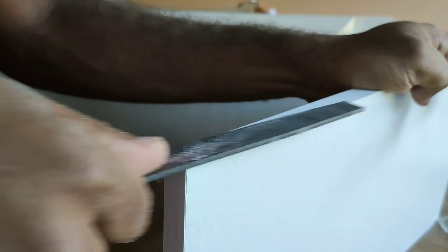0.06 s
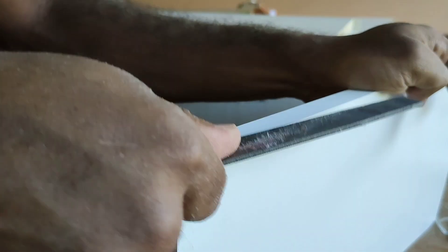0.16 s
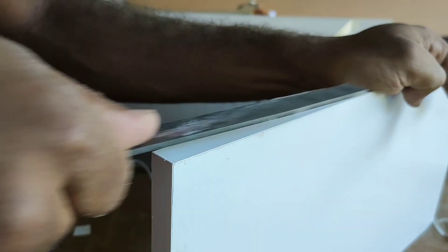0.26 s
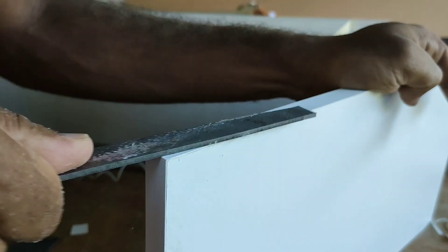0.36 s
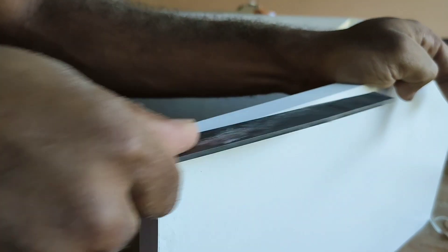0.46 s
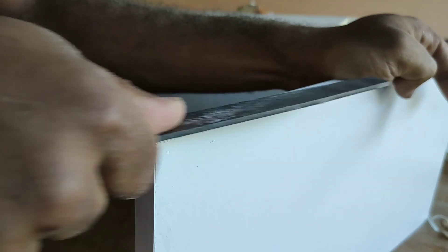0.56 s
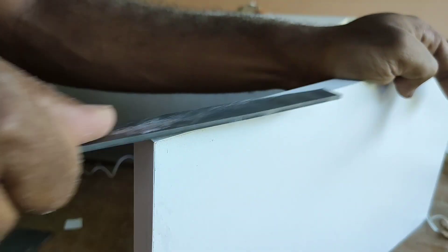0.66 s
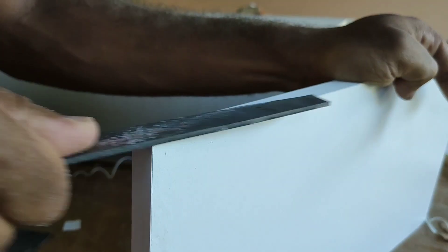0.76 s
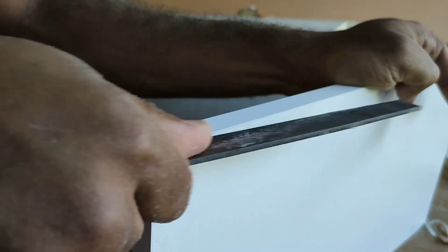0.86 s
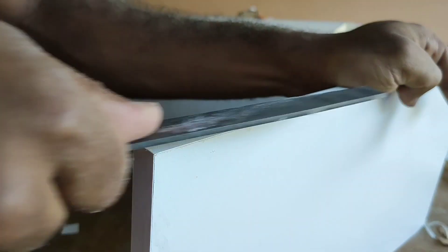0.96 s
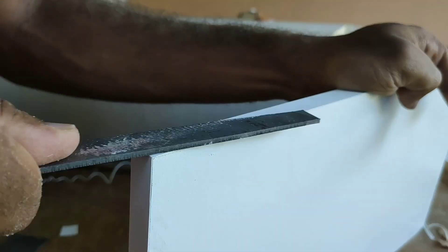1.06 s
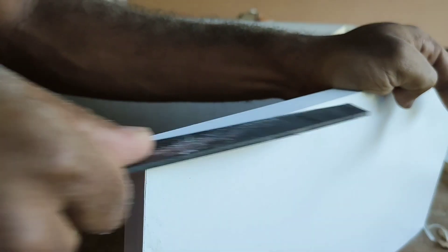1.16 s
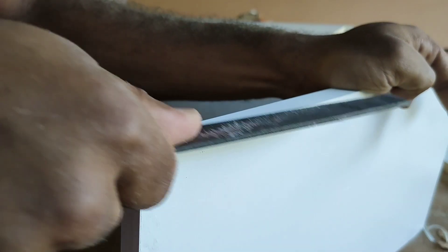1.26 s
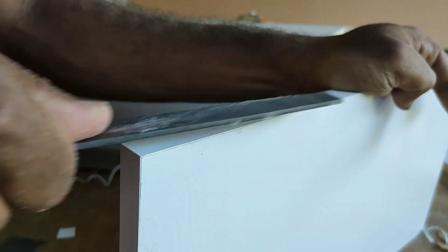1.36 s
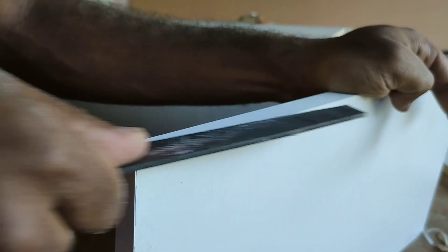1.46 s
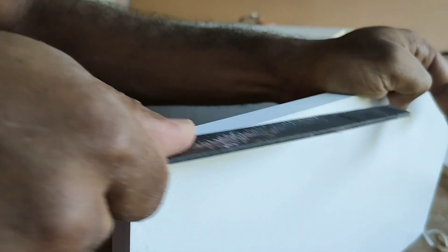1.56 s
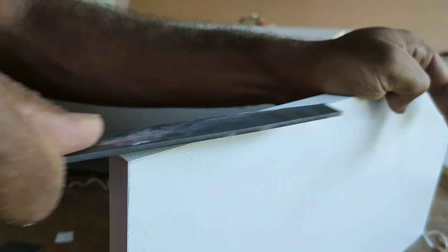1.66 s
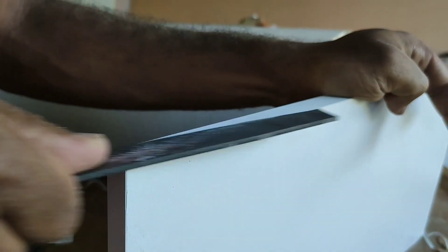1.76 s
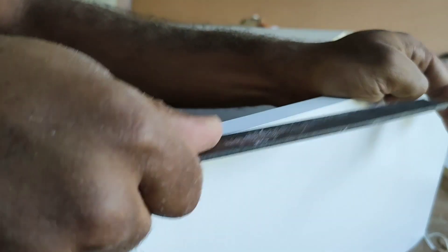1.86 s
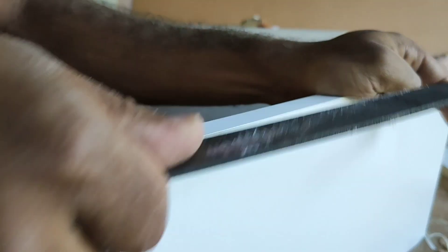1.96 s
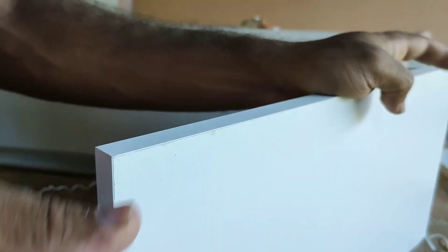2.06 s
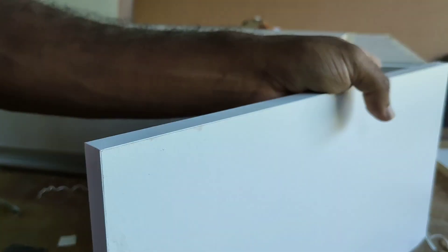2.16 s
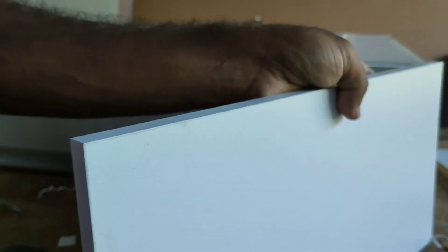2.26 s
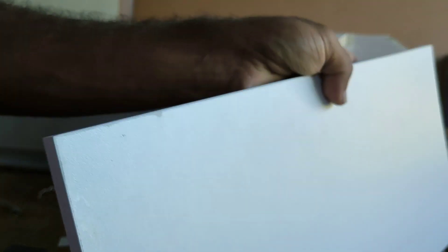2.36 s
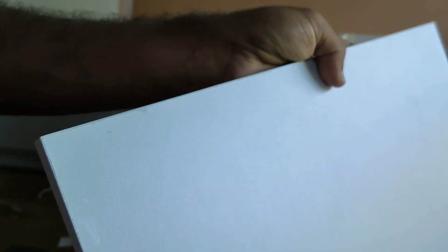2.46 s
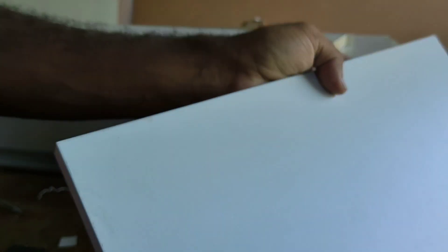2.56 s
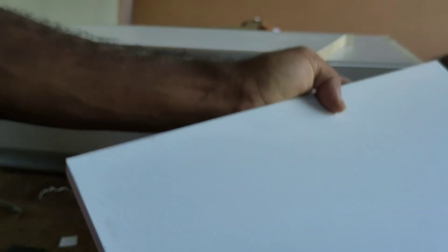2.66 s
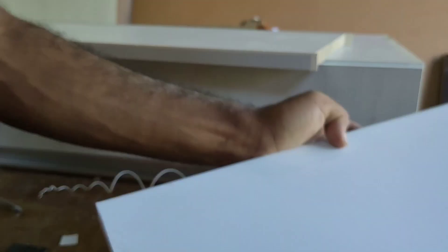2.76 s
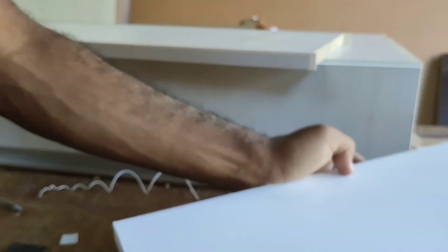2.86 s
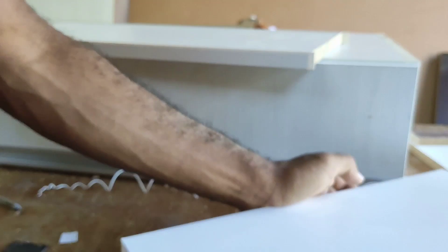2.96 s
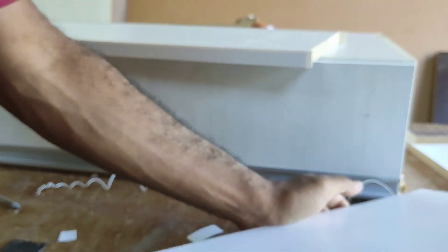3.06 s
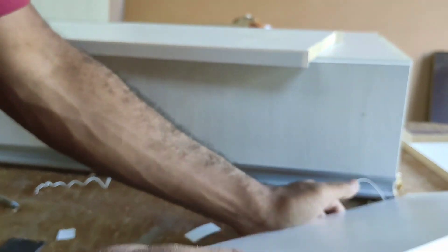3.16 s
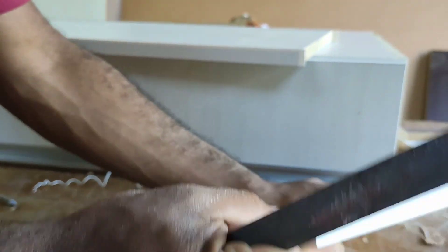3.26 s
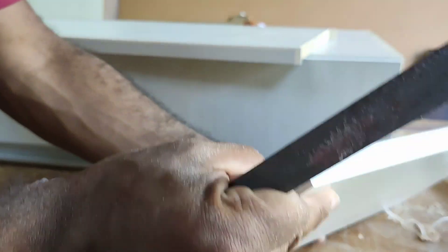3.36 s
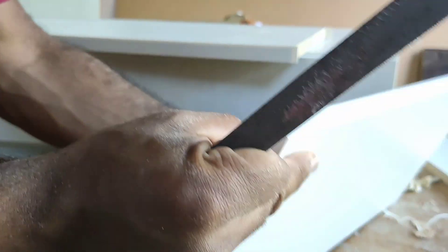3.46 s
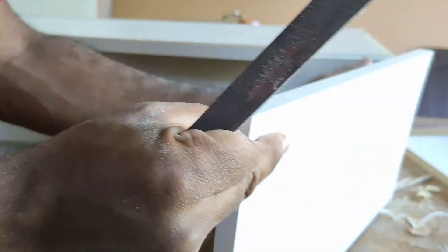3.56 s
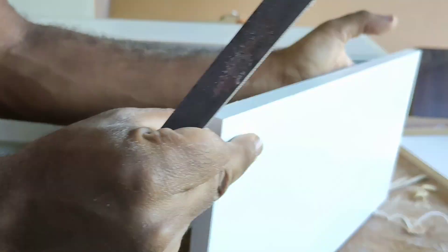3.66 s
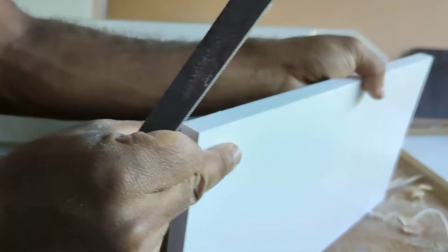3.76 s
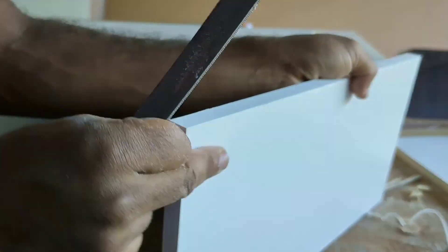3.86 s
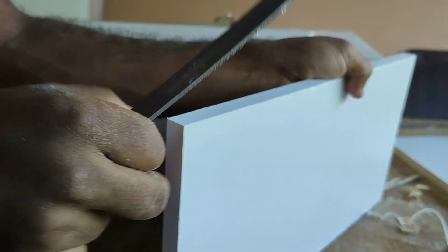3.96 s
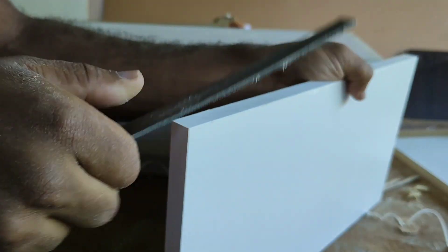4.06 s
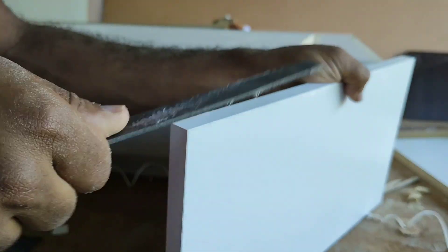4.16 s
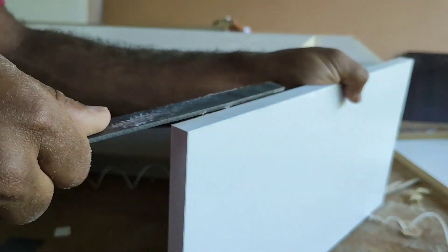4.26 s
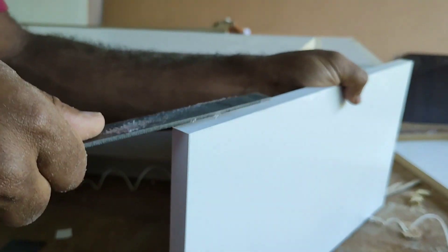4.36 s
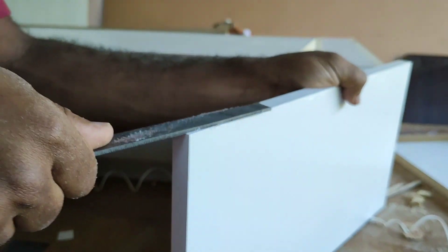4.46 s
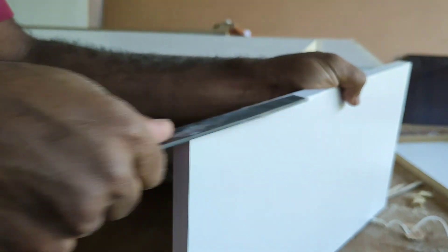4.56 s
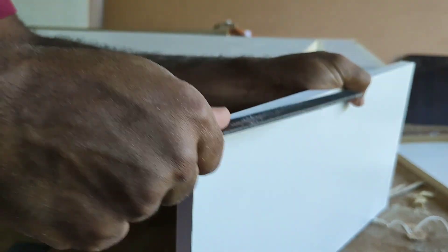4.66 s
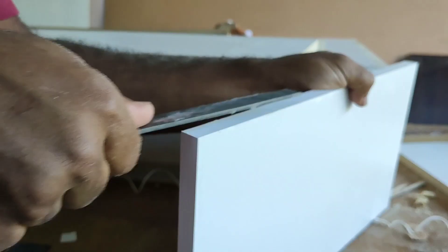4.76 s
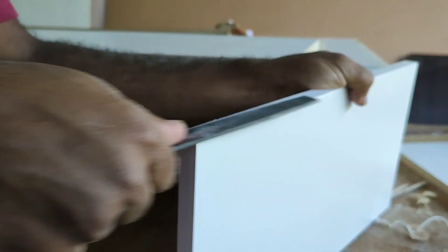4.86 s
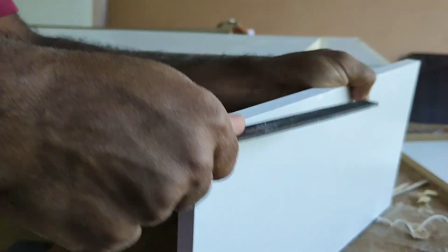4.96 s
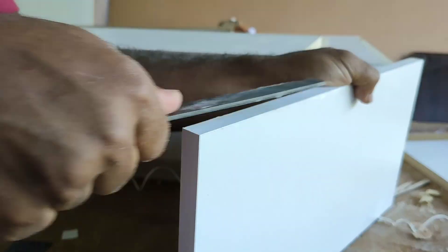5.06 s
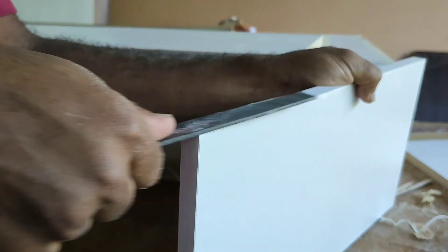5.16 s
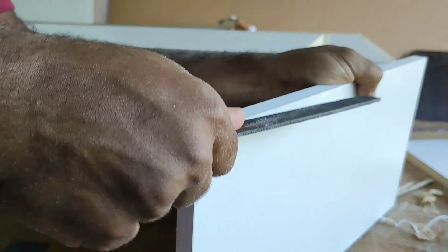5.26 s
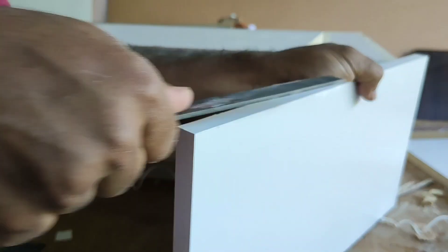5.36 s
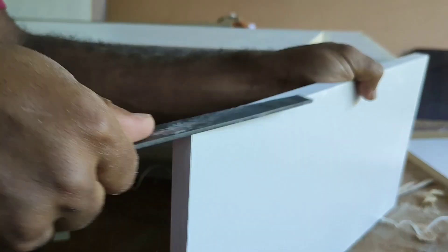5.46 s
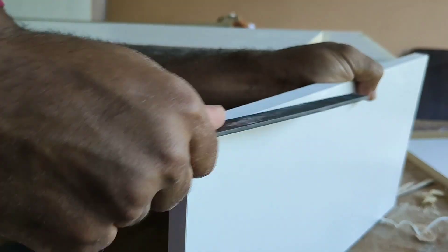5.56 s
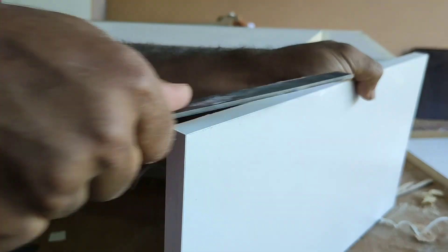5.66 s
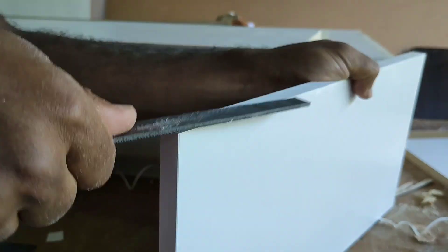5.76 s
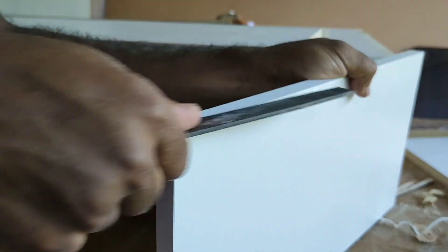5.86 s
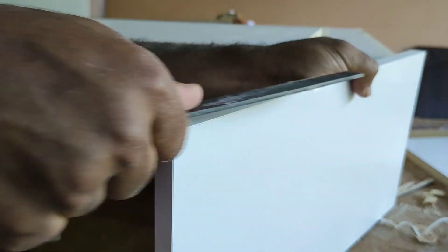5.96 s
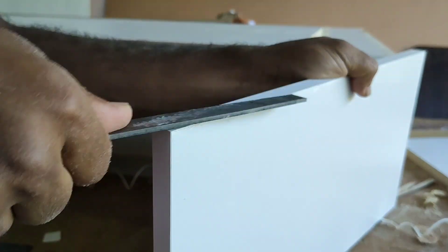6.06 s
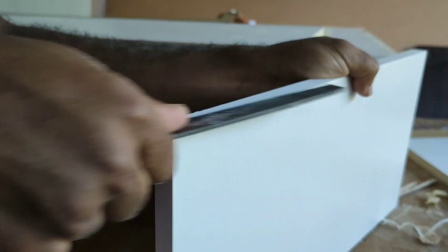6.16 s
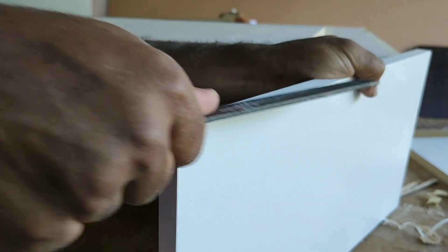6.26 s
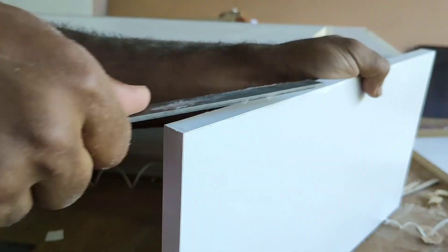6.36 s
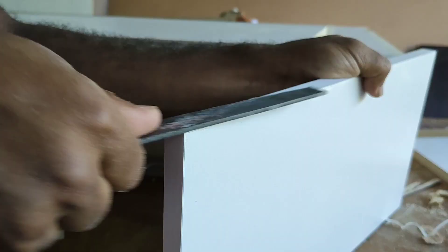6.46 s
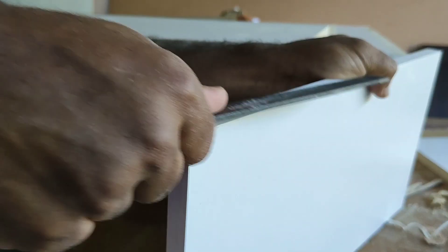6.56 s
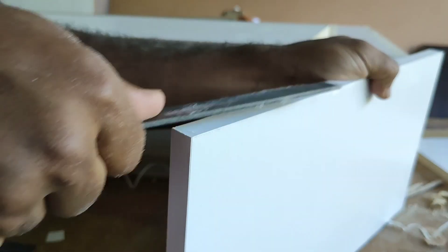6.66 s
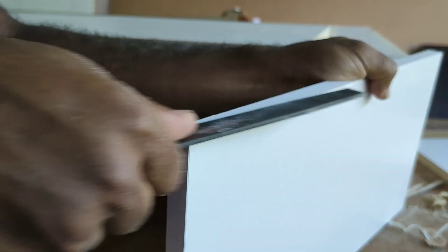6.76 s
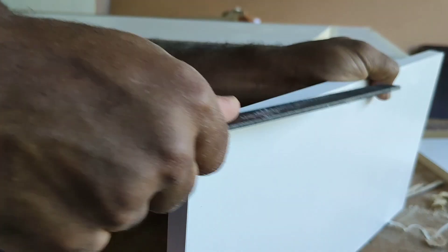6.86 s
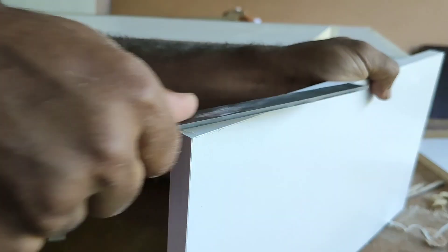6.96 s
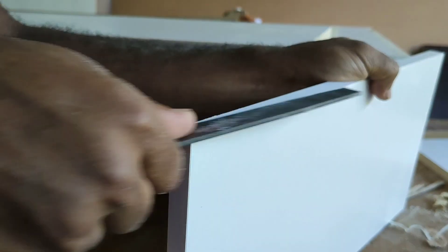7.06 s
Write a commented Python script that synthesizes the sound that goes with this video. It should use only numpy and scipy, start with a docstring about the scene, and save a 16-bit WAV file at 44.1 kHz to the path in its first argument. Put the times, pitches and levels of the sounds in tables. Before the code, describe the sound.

A steel file rasps along a board's edge in quick strokes, pausing for light taps and a knock, in a small workshop.

```python
"""The room's ring from an earlier stroke fades, and a flat steel file lands on the edge of a coated board
and is pushed along it, about three times a second. Its teeth slip over the edge one by one and drive the
board's modes, while torn chips hiss. After six strokes, hands brush and tap the board as they turn it
over, and set it on the bench with a knock. Eight strokes follow on the other edge, then one last landing
of the file. Throughout, a small bare workshop reverberates over a low murmur."""
import sys
import numpy as np
from scipy import signal
from scipy.fft import rfft, irfft, next_fast_len
from scipy.io import wavfile
from scipy.ndimage import uniform_filter1d

SR = 44100
rng = np.random.default_rng(int(sys.argv[2]) if len(sys.argv) > 2 else 0)


def persist_wave(psi):
    """Save psi, clipped to +-1, as 16-bit WAV."""
    counts = np.round(np.clip(psi, -1, 1) * 32767).astype(np.int16)
    wavfile.write(sys.argv[1], SR, np.atleast_2d(counts).T)


N = 313551

# Strokes of the file; delays count from the touch and levels are relative. Each row: touch in seconds;
# delays to bearing down, hardest push and stop in seconds; levels of rasp, chip hiss, settling judder,
# stopping judder and singing teeth in dB; delay and hold of the singing in seconds, its swell in dB per
# second; delay to the fastest slipping in seconds, that slip rate in Hz, run-up and run-out in seconds;
# rate that slowing teeth cling to in Hz; base levels of the second and third harmonics in dB.
STROKES = [ (.064, 0.037, 0.11, 0.18, -32, -40.5, -39, -36.5, -38.5, 0.13, 0.015, 347, 0.11, 740, .11, 0.082, 498, 2.5, -1),
           (.43, 0.014, 0.11, 0.16, -31.5, -38.5, -38, -46, -27.5, 0.12, 0.015, 398, 0.096, 830, 0.072, .063, 604, -4.5, -9.5),
           (.752, 0.047, 0.11, 0.17, -32.5, -39.5, -36, -43, -29, 0.13, 0.029, 354, 0.11, 730, .13, 0.083, 602, -5, -9),
           (1.111, 0.032, 0.1, 0.17, -34.5, -39.5, -39.5, -60, -38.5, 0.11, 0.029, 300, 0.11, 739, .093, 0.089, 510, 3, 3.5),
           (1.468, 0.0069, 0.082, .16, -34.5, -43, -36.5, -50, -43.5, 0.093, 0.034, 295, 0.093, 700, 0.08, 0.08, 518, 7.5, 6.5),
           (1.807, 0.0067, 0.08, 0.12, -32.5, -39.5, -50.5, -66, -36.5, 0.058, 0.024, 350, 0.096, 840.5, 0.081, .09, 620, 3.1, -2.5),
           (4.512, 0.034, 0.11, 0.18, -31, -41, -38.5, -47, -21, 0.123, 0.015, 1800, 0.11, 750, 0.092, 0.061, 672.2, -8, -10.5),
           (4.905, 0.0011, 0.048, .12, -30.5, -39, -34, -40, -29, 0.051, 0.017, 500, 0.069, 799, .069, 0.19, 645, -11, -9),
           (5.218, .001, 0.098, 0.13, -31.5, -40.5, -30, -64, -35.5, 0.067, 0.021, 400, 0.078, 750.7, 0.099, 0.12, 619, 0.5, -6),
           (5.529, 0.0022, 0.077, 0.15, -32.5, -44.5, -30.5, -59, -43.5, 0.078, 0.016, 400, 0.087, 688, 0.083, 0.15, 620, -3.5, -4.5),
           (5.862, 0.0023, 0.088, 0.13, -31, -42.5, -34.5, -53, -39, 0.064, 0.0081, 500, 0.071, 700, .053, 0.06, 590, -20, -5),
           (6.153, 0.033, .12, 0.147, -31.5, -39.5, -32.5, -38.5, -35, .088, 0.013, 500, 0.11, 752, 0.058, 0.064, 573, -5, -2.5),
           (6.502, .001, 0.058, 0.13, -30.5, -44, -32, -43, -40, 0.048, 0.026, 398, 0.051, 672.6, 0.12, 0.084, 528, -7.5, -8),
           (6.789, .001, 0.087, 0.13, -29.5, -40, -31, -37.5, -42, 0.061, 0.027, 400, 0.099, 649, 0.11, 0.1, 527, -0.5, -8.5),
           ]
# Normal modes of the board. Each row: frequency in Hz, time to decay 60 dB in seconds before the file
# damps it, and weights in dB for filing the first edge, filing the second edge and a landing.
BOARD_MODES = [(108.7, 0.12, -35, -39, -23.5), (210, 0.16, -39.5, -28.5, -22), (310, 0.041, -39.5, -4, -9),
               (421.5, 0.039, -29.5, -3.5, 5.5), (643, 0.14, 4, -43, -36), (700, 0.032, 6.5, 9.5, -0.5),
               (900, 0.22, 0, -11, -22), (1122.5, 0.05, 15, 3, 6.5), (1352, 0.053, 1.5, 9, -0.5),
               (1422, 0.033, 18, -43, 3), (1712, 0.043, 4.5, 6.5, 3.5), (1783, 0.086, -19, 11, -17.5),
               (1945, 0.045, 14.5, -3.5, 3), (2280, 0.014, -57, -3.5, 7), (2340, 0.014, -19, -20, -30.5),
               (2496, 0.033, -61, -45, -10.5), (2997, 0.021, -22.5, 0, -13), (3475, 0.012, -34, -37, -7)]
TURNED_S = 3.0  # later strokes are on the second edge


def filing():
    """Forced vibration: friction drives the board's modes. Returns their sound and the chips' envelope."""
    hz, t60, first_edge_db, second_edge_db, _ = np.transpose(BOARD_MODES)
    low = hz < 500
    t = np.arange(SR // 5) / SR
    board, chip_envelope = np.zeros(N), np.zeros(N)
    for row in STROKES:
        touch, down, hardest, stop = row[:4]
        rasp_db, hiss_db = pressure_levels(t, down, hardest, stop, *row[4:6])
        judder_db = judder_level(t, stop, *row[6:8])
        teeth, cycles = tooth_slips(t, *row[8:])
        catches, clumps = tooth_catches(len(t))
        contact = np.clip(np.minimum(t, stop - t) / 0.0063, 0, 1)
        mode_db = first_edge_db if touch < TURNED_S else second_edge_db
        drives = ((amp(rasp_db) * catches, ~low, 0.6), (amp(judder_db) * catches, low, 0.8),
                  (teeth, ~low, 0.4))  # teeth under pressure damp the edge
        for force, modes, decay_share in drives:
            response = ring(hz[modes], mode_db[modes], decay_share * t60[modes])
            add(board, touch, signal.fftconvolve(force * contact, response / np.linalg.norm(response)))
        add(board, touch, amp(-12.5) * teeth * contact)  # slips heard directly, past the modes
        tooth_pulse = 1 + 0.25 * np.cos(2 * np.pi * cycles)
        add(chip_envelope, touch, amp(hiss_db) * contact * clumps ** 0.13 * tooth_pulse)
    board = signal.lfilter([1, -1], [1, -0.985], board)  # a small panel radiates little bass
    return board, chip_envelope


def tooth_slips(t, sing_db, onset, hold, swell, fastest, top_hz, run_up, run_out, cling_hz, two_db, three_db):
    """Stick-slip motion: evenly spaced teeth sing in harmonics. Returns the force and its cycle count."""
    level_db = sing_db - swell * np.maximum(onset - t, 0)
    level_db -= 802 * np.maximum(t - onset - hold, 0)  # fall in dB per second
    speeding = t < fastest
    arch_hz = top_hz * (1 - ((t - fastest) / np.where(speeding, run_up, run_out)) ** 2)
    slip_hz = np.maximum(arch_hz, np.where(speeding, 250, cling_hz))  # a board mode holds the slip rate
    cycles = np.cumsum(slip_hz * (1 + 0.011 * flicker(len(t), size=300))) / SR  # the hand is never even
    cycles += 0.045 * flicker(len(t), size=90)  # each tooth slips a little early or late
    lift_db = np.minimum(0.59 * (level_db.max() - level_db), 16.5)  # overtones outlast the fundamental
    overtones_db = [db + lift_db for db in (two_db, three_db, three_db - 3.5, three_db - 2)]
    force = np.zeros(len(t))
    for harmonic, db in enumerate([0, *overtones_db], start=1):
        chatter_db = 2 * flicker(len(t), size=350)
        force += amp(level_db + db + chatter_db) * np.cos(2 * np.pi * harmonic * cycles)
    return force * (slip_hz / top_hz) ** 3.1, cycles  # slow teeth dig in rather than sing


def tooth_catches(count, per_second=3000):
    """Shot noise: teeth catch at random and chips tear off in clumps. Returns impulses and clump gain."""
    clumps = amp(2.54 * flicker(count, size=200))
    strength = amp(3.6 * np.minimum(rng.exponential(1, count), 4))
    caught = rng.random(count) < per_second / SR
    return unit_rms(clumps * strength * caught * rng.choice([-1, 1], count)), clumps


def pressure_levels(t, down, hardest, stop, rasp_db, hiss_db):
    """Friction noise follows a power law of contact pressure. Returns rasp and hiss levels in dB."""
    rising = t < hardest
    bearing_down = (t - down) / (hardest - down)
    easing_off = 1 - abs((t - hardest) / (stop - hardest)) ** 2.4
    pressure = np.clip(np.where(rising, bearing_down, easing_off), 0.055, 1)  # floor: the file's weight
    decades = np.log10(pressure)
    rasp_db = rasp_db + decades * np.where(rising, 15, 23.5) - 30 * (t < down)
    hiss_db = hiss_db + decades * np.where(rising, 31.5, 26)
    rattle_db = -42 - 885.5 * t  # the file rattles briefly after the touch
    return power_sum_db(rasp_db, rattle_db), hiss_db


def judder_level(t, stop, settle_db, halt_db):
    """Transient excitation, in dB: the file judders as it settles and again just before it stops."""
    settling_db = settle_db - 292 * abs(t - 0.007)
    halting_db = halt_db - 10 * ((t - stop + 0.011) / 0.011) ** 2
    return power_sum_db(settling_db, halting_db)


# Landings of the file on the edge. Each row: start in seconds, peak levels of the low, middle, high
# and top mode groups in dB, level of the steel's snap in dB.
LANDINGS = [(.064, -42, -31.5, -31, -29.5, -46), (.43, -35.5, -28.5, -27.5, -24, -39),
            (.752, -28.5, -14, -24.5, -22.5, -51.5), (1.111, -26, -19, -19.5, -23, -49),
            (1.468, -30.5, -18, -24.5, -20.5, -47), (1.807, -22.5, -18.5, -28, -25.5, -53),
            (4.512, -48.5, -59, -73, -57, -87), (4.572, -27.5, -34, -47, -43, -59),
            (4.906, -47, -23, -24.5, -22, -34), (5.218, -36, -30, -29, -19.5, -36.5),
            (5.528, -38, -23.5, -23, -22, -43.5), (5.863, -22.5, -13, -17, -26, -43.5),
            (6.153, -20, -15.5, -21, -32, -49.5), (6.502, -29, -18, -15, -21, -38),
            (6.789, -26, -22, -19, -19.5, -32), (7.084, -17.5, -14, -16.5, -23.5, -43)]


def landings():
    """Impact excitation: each landing rings the board's modes, weighted by the point of contact."""
    hz, t60, _, _, landing_db = np.transpose(BOARD_MODES)
    groups = np.digitize(hz, (500, 1600, 2100))  # borders in Hz
    out = np.zeros(N)
    for start, *peaks_db, _ in LANDINGS:
        mode_db = landing_db + 2.47 * rng.standard_normal(len(hz))
        for group, peak_db in enumerate(peaks_db):
            modes = groups == group
            hit = ring(hz[modes], mode_db[modes], 0.8 * t60[modes], contact_s=0.00095)
            add(out, start, at_peak(hit, peak_db))
    return out


# Spectrum of the chips and snaps. Each row: frequency in Hz, relative spectral density in dB.
CHIP_SPECTRUM = [(1500, -39.5), (2500, -4), (3470, -11.5), (3900, -23), (4300, -22.5), (4800, -12),
                 (5800, -12), (7380, -5), (8700, -16.5), (9200, -33.5), (11700, -31.5), (13000, -49.5)]


def chips_and_snaps(chip_envelope):
    """Broadband noise: chips hiss as they tear, and steel snaps against the coating at each landing."""
    t = np.arange(2000) / SR
    snaps = np.zeros(N)
    for start, *_, snap_db in LANDINGS:
        add(snaps, start, amp(snap_db - 60 * t / 0.081) * np.minimum(t / 0.002, 1))
    return (chip_envelope + snaps) * diffuse_noise(CHIP_SPECTRUM, patchy_db=0.5)


# Modes of the knock on the bench. Each row: frequency in Hz, weight in dB, 60 dB decay time in seconds.
BENCH_MODES = [(113, -10.5, 0.098), (186.3, -8.5, 0.17), (294, 3, 0.075), (339, -4.5, 0.076),
               (494, -9, 0.076), (604, -1, 0.033), (900, -4, 0.018), (1350, -15, 0.033),
               (1704, -19.5, 0.05), (2060, -22, 0.052), (2480, -13.5, 0.013), (3250, -24, 0.02),
               (3780, -26.5, 0.018)]


def bench_knock(start=3.853, peak_db=-11):
    """Free vibration: board and bench ring from one blow as the board is set down."""
    out = np.zeros(N)
    add(out, start, at_peak(ring(*np.transpose(BENCH_MODES), contact_s=0.0016), peak_db))
    return out


# Taps of the hands. Each row: start in seconds, peak level in dB, pitch in Hz, 60 dB decay time in seconds.
HAND_TAPS = [(2.172, -45.5, 315, 0.038), (2.334, -46, 310, 0.081), (2.42, -53.5, 356, 0.02),
             (2.464, -49.5, 248.5, 0.027), (2.586, -52, 913, 0.025), (2.939, -52.5, 1183, .018),
             (3.213, -46.5, 350, 0.028), (3.333, -39.5, 600, 0.032), (3.399, -43, 765, .02),
             (3.561, -47.5, 1050, 0.023), (3.618, -46, 900, 0.071), (3.672, -39.5, 1710, 0.044),
             (3.993, -49.5, 1890, .02), (4.038, -43.5, 1675, 0.034), (4.26, -35, 665, 0.021)]


def hand_taps():
    """Damped resonance: each light touch on the board excites three short inharmonic modes."""
    out = np.zeros(N)
    for start, peak_db, pitch_hz, t60 in HAND_TAPS:
        tap = ring(pitch_hz * np.array([0.7, 1, 1.4]), np.array([-4, 0, -6]), t60, contact_s=0.0014)
        add(out, start, at_peak(tap, peak_db))
    return out


# Reverberation of the workshop. Each row: frequency in Hz, 60 dB decay time in seconds.
ROOM_DECAY = [(100, 0.58), (300, 0.52), (700, 0.67), (1500, 0.41), (4000, 0.56), (9000, 0.28)]


def reverberation(sound):
    """Sparse reflections of random sign arrive at each ear; absorption sets the decay of each band."""
    echoes = np.zeros((2, SR // 2))
    slots = np.arange(300, SR // 2 - 20, 20)
    arrivals = slots + rng.integers(0, 20, (2, len(slots)))
    np.put_along_axis(echoes, arrivals, rng.choice([-1., 1.], arrivals.shape), 1)
    echoes[1] = 0.74 * echoes[0] + 0.7 * echoes[1]  # nearby points share reflections
    hz, t, bands = signal.stft(echoes, SR, nperseg=256)
    tail = signal.istft(bands * amp(-60 * t / curve_at(ROOM_DECAY, hz)[:, None]), SR, nperseg=256)[1]
    return signal.fftconvolve(sound, tail / np.linalg.norm(tail[0]), axes=1)[:, :N]


# Course of the background. Each row: time in seconds, low noise level in dB, brushing level in dB.
# The room's ring from an earlier stroke fades in the first 0.07 s, leaving the low murmur.
BACKGROUND_LEVELS = [(0, -53, -86), (.07, -60.5, -75.5), (1.95, -60, -93), (2.1, -59.5, -69.5),
                     (2.36, -55, -64.5), (2.6, -66.5, -78), (2.83, -60, -62.5), (3.02, -63, -72.5),
                     (3.27, -63.5, -73), (3.399, -56.5, -59), (3.55, -58, -66), (3.68, -55, -61),
                     (3.931, -62, -67.5), (4.3, -64, -85.5), (4.48, -69, -91)]
# Spectra of the low noise and the brushing. Each row: frequency in Hz, relative spectral density in dB.
LOW_SPECTRUM = [(18, -28.5), (30, -15.5), (133, -5.5), (488, -13.5), (577, -12), (1040, -14), (1180, -12),
                (1280, -15.5), (2030, -13), (4500, -33), (5850, -46.5), (9900, -120)]
BRUSH_SPECTRUM = [(2060, -44), (3500, -15.5), (4100, -20.5), (4900, -20), (5600, -13), (7440, -6.5),
                  (8000, -8.5), (8800, -13.5), (9300, -25), (11700, -20.5), (13000, -56.5)]


def shop_and_brushing(steady_hiss_db=-69.5):
    """Ambient noise: the room's ring fades to a murmur; brushing hands add in power to a steady hiss."""
    times, low_db, brush_db = np.transpose(BACKGROUND_LEVELS)
    t = np.arange(N) / SR
    low_gain = amp(np.interp(t, times, low_db, right=-64))
    hiss_gain = np.hypot(amp(np.interp(t, times, brush_db, right=-76)), amp(steady_hiss_db))
    low_noise = low_gain * diffuse_noise(LOW_SPECTRUM, patchy_db=3.5)
    return low_noise + hiss_gain * diffuse_noise(BRUSH_SPECTRUM, patchy_db=2.5)


# Likeness of diffuse sound at the two ears. Each row: frequency in Hz, correlation from 0 to 1.
COHERENCE = [(60, 0.037), (180, 0.75), (500, 0.43), (1000, 0.46), (2000, 0), (9000, 0)]


def diffuse_noise(spectrum, patchy_db):
    """Partial coherence: two partly alike channels of coloured noise, with drifting spectral patches."""
    hz = np.fft.rfftfreq(512, 1 / SR)
    a, b, c, d, patches = rng.standard_normal((N // 128 + 5, 257, 5)).T
    patches = uniform_filter1d(patches, size=8, axis=0)
    patches = unit_rms(uniform_filter1d(patches, size=10, axis=1))
    coherence = curve_at(COHERENCE, hz)[:, None]
    left = a + 1j * b
    right = coherence * left + np.sqrt(1 - coherence ** 2) * (c + 1j * d)
    bands = np.array([left, right]) * amp(curve_at(spectrum, hz)[:, None] + patchy_db * patches)
    return unit_rms(signal.istft(bands, nperseg=512, noverlap=384)[1][:, :N])


# Phase of the board's sound at the ears. Each row: frequency in Hz, lead of the right ear in radians.
PHASE_LEAD = [(100, .5), (250, .35), (500, .6), (1000, .7), (2000, 1.2), (4000, 1.5)]


def phase_spread(sound):
    """Interaural phase difference: the right ear leads, most of all in the treble."""
    size = next_fast_len(N)
    half_lead = np.exp(0.5j * curve_at(PHASE_LEAD, np.fft.rfftfreq(size, 1 / SR)))
    return irfft(rfft(sound, size) * np.array([1 / half_lead, half_lead]), size)[:, :N]


def ring(hz, db, t60, contact_s=1e-4):
    """Modal superposition: decaying sines whose onset is softened by the contact time."""
    t = np.arange(SR // 6)[:, None] / SR
    modes = amp(db - 60 * t / t60) * np.sin(2 * np.pi * hz * t)
    return modes.sum(1) * (1 - np.exp(-(t[:, 0] / contact_s) ** 2))


def flicker(count, size):
    """Random fluctuation of rms 1, smoothed over size samples."""
    return unit_rms(uniform_filter1d(rng.standard_normal(count), size=size))


def amp(db):
    """Amplitude ratio of a level in decibels."""
    return 10 ** (np.asarray(db) / 20)


def power_sum_db(*levels_db):
    """Incoherent sounds add in power."""
    return 10 * np.log10(sum(amp(level) ** 2 for level in levels_db))


def unit_rms(x):
    """Normalisation to rms 1."""
    return x / np.sqrt(np.mean(x ** 2) + 1e-20)


def at_peak(x, db):
    """Normalisation to a peak level."""
    return amp(db) * x / abs(x).max()


def curve_at(points, hz):
    """Interpolation on a log-frequency axis."""
    point_hz, values = np.transpose(points)
    return np.interp(np.log(hz + 1), np.log(point_hz + 1), values)


def add(mix, start, sound):
    """Superposition of a sound from its start in seconds."""
    part = mix[round(start * SR):][:len(sound)]
    part += sound[:len(part)]


def scene():
    """Direct sound, reverberant field and background add linearly."""
    board, chip_envelope = filing()
    chips = chips_and_snaps(chip_envelope)
    knock = bench_knock()
    direct = phase_spread(board + landings() + hand_taps() + knock) + chips
    room = reverberation(amp(-13.5) * direct + amp(-17) * knock)  # bench and floor boom on
    return direct + room + shop_and_brushing()


# Level difference between the channels. Each row: frequency in Hz, left minus right in dB.
BALANCE = [(60, 2.5), (94, 14), (150, 5.5), (230, 0.5), (900, 0.5), (2210, 4), (3470, 3), (5450, -4),
           (8550, 0.5)]


def record(dry, bass_cut_hz=119, treble_cut_hz=11650):
    """Linear filtering: each channel has its own colour and little bass, then a low-pass limits both."""
    hz = np.linspace(0, SR / 2, 2049)
    lean_db = curve_at(BALANCE, hz) / 2
    bass_gain = np.maximum(1 / np.sqrt(1 + (bass_cut_hz / (hz + 1)) ** 7), amp(-14.5))
    colours = np.array([signal.firwin2(2047, hz, bass_gain * amp(side * lean_db), fs=SR)
                        for side in (1, -1)])
    coloured = signal.oaconvolve(dry, colours, "same", axes=1)
    low_pass = signal.firwin(511, treble_cut_hz, window=("kaiser", 9), fs=SR)
    return signal.oaconvolve(coloured, low_pass[None], "same")


dry = scene()
out = record(dry)
persist_wave(out)
```